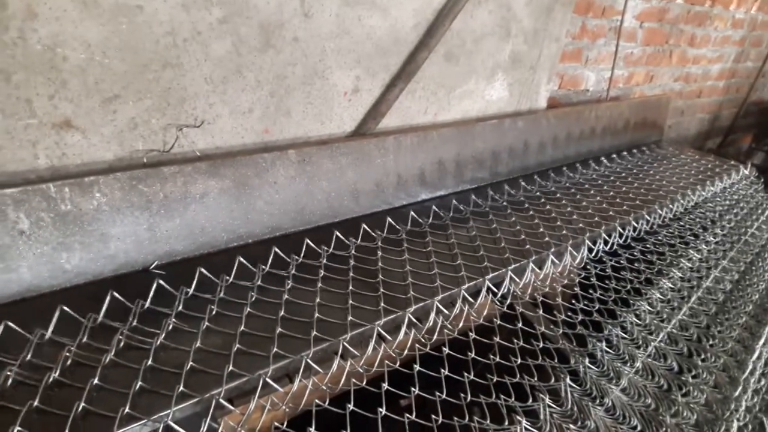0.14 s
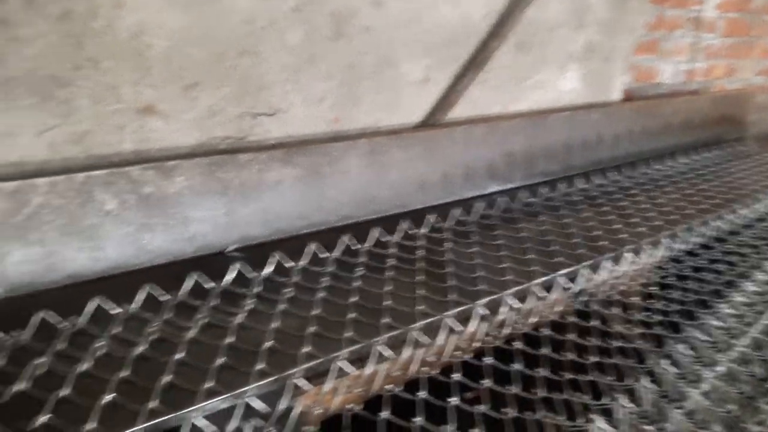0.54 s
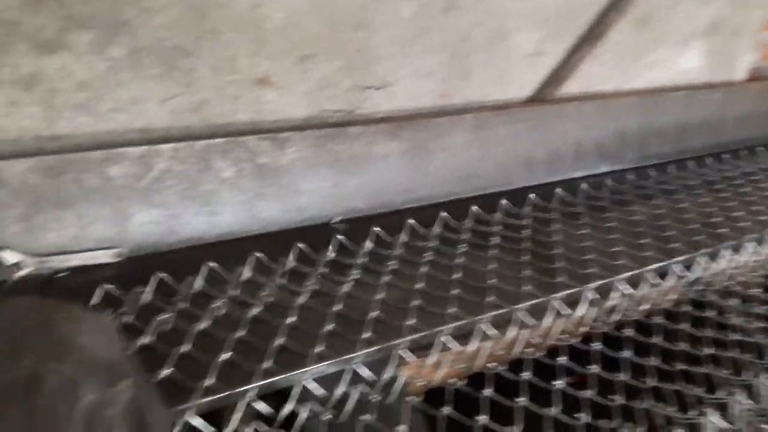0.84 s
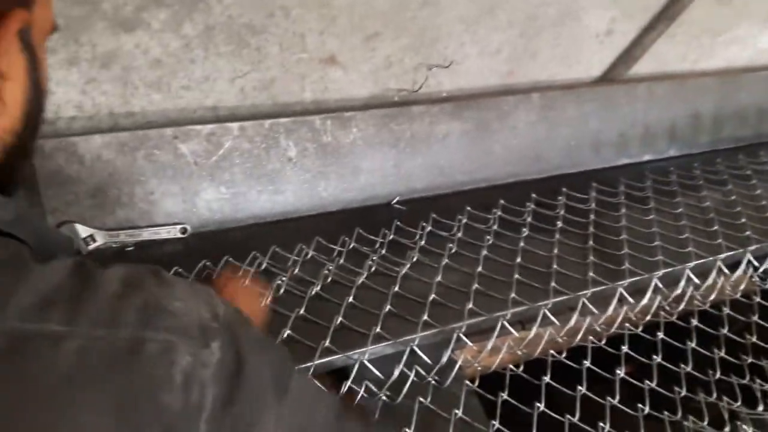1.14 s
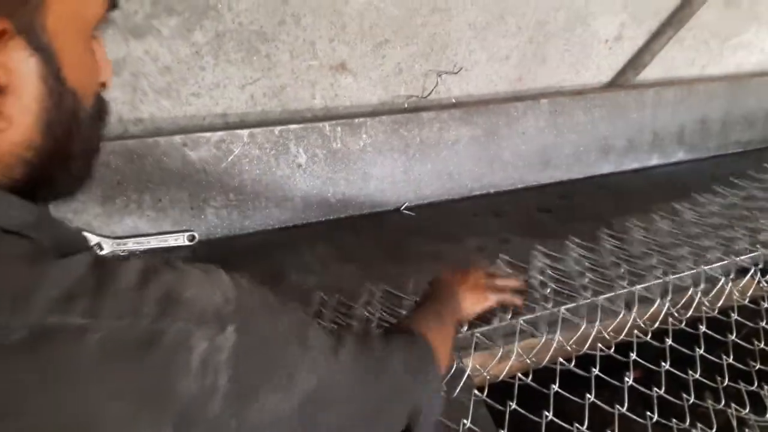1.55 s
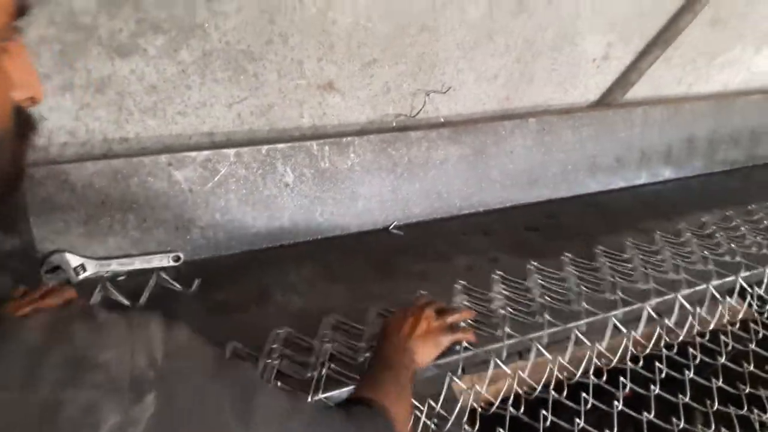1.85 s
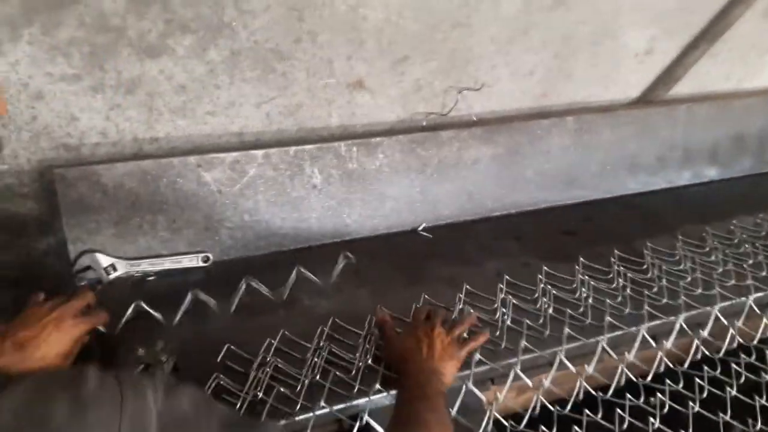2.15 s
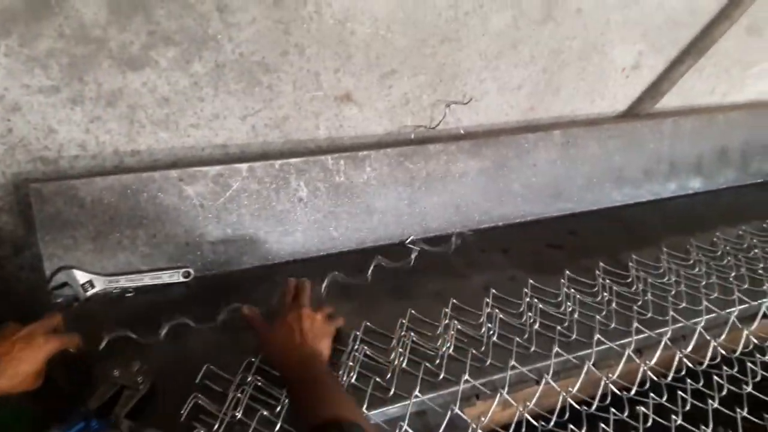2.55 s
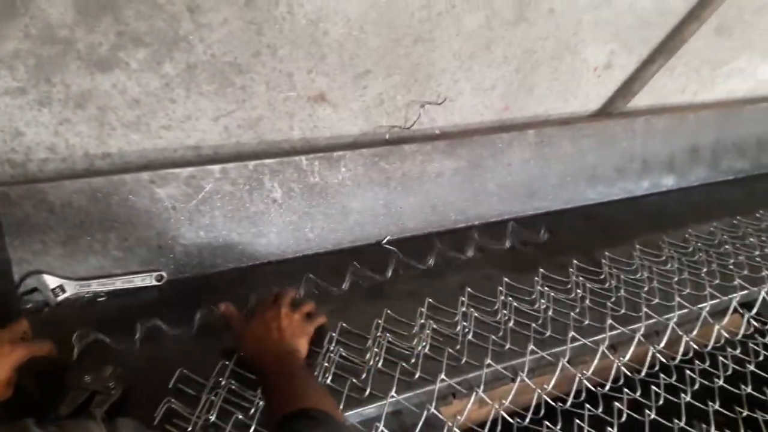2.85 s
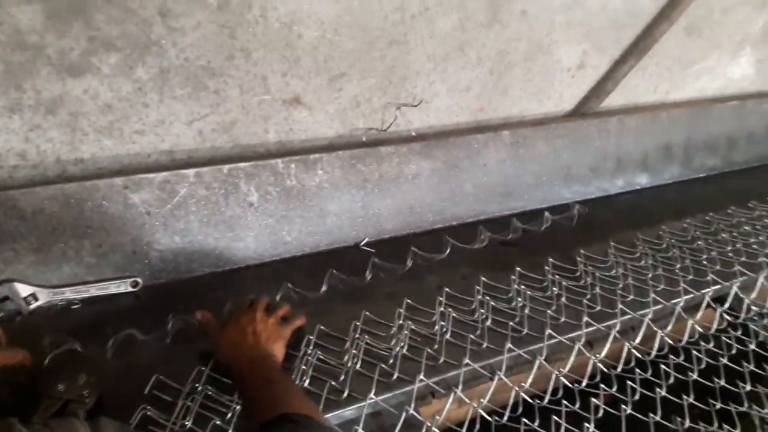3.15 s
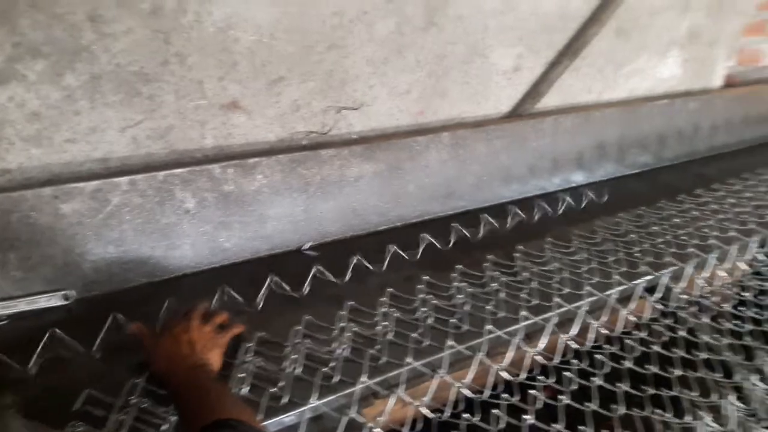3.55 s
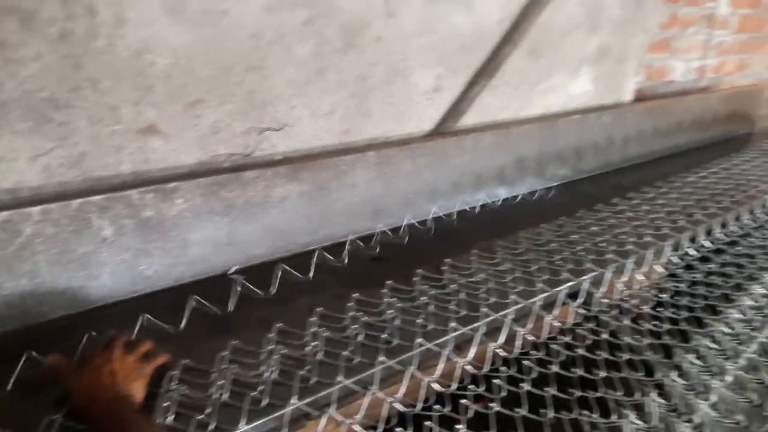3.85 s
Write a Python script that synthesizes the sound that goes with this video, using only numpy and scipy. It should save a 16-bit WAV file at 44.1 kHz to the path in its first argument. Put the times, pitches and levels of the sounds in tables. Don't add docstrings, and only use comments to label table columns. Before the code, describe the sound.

A chain-link weaving machine heard close in a hard-walled workshop. Loud mesh rattle at 0 s fades by 0.4 s to low hum. From 0.8 to 1.5 s, light hand-shifted clinks and dull knocks. Around 1.5 s the motor rumbles up; from 1.8 s irregular wire slaps grow, settling by 3 s into harsh metallic clatter about sixteen times a second until 4 s, piercingly bright, distorted, with short echo.

```python
import sys
import numpy as np
from scipy import signal
from scipy.fft import rfft, irfft
from scipy.io import wavfile
from scipy.ndimage import uniform_filter1d

SR = 44100
rng = np.random.default_rng(int(sys.argv[2]) if len(sys.argv) > 2 else 0)


def to_wav(s):
    ch = np.atleast_2d(s).T
    pcm = np.round(np.clip(ch, -1, 1) * 32767)
    wavfile.write(sys.argv[1], SR, pcm.astype(np.int16))


def undo_db(level):
    steps = np.asarray(level, float) / 20
    return 10 ** steps


N = 176400
T = np.arange(N) / SR

# start [s], peak level [dB], hold [s], rise [s].
START_SLAPS = [(1.808, -13, 0.022, 0.001), (1.823, -10, 0.017, 0.001), (1.905, -6, 0.0082, 0.001),
               (1.933, -4, 0.006, 0.0007), (1.966, -1, 0.024, 0.00077), (2.089, -3, 0.003, 0.0007),
               (2.096, 2.5, 0.021, 0.0018), (2.140, -1, 0.018, 0.0009), (2.2, 1.5, 0.021, 0.001),
               (2.23, 2.5, 0.014, 0.001), (2.263, 4.5, 0.015, 0.001), (2.329, -1.5, 0.012, 0.001),
               (2.383, 1, 0.018, 0.0011), (2.485, -1, 0.029, 0.0013), (2.578, -11, 0.024, 0.00083),
               (2.617, 1, 0.018, 0.005), (2.74, 7.5, 0.011, 0.0011), (2.787, -1.5, 0.044, 0.001),
               (2.854, 6, 0.021, 0.003)]
SPEED_SLAPS = [(2.981, 5, 0.015, 0.003), (3.044, -1, 0.014, 0.0045), (3.102, 5, 0.013, 0.001),
               (3.1619, 5, 0.015, .001), (3.221, 4.5, 0.034, .001), (3.284, 2, 0.011, 0.002),
               (3.301, -1, 0.017, .001), (3.342, 0.5, 0.011, 0.003), (3.355, 6, 0.022, .001),
               (3.399, 2.5, 0.033, 0.0062), (3.465, -0.5, .008, .001), (3.488, 6, 0.019, 0.005),
               (3.564, -1.5, 0.011, 0.0018), (3.611, 3, 0.034, .001), (3.667, -1, 0.024, 0.0017),
               (3.731, 4.5, 0.023, .002), (3.795, 2.5, 0.017, 0.0029), (3.847, 2, 0.031, 0.0044),
               (3.912, -0.5, 0.035, 0.0058), (3.974, 0.5, .004, .001), (3.982, 8, 0.027, .001)]


def unit(x):
    return x / np.sqrt(np.mean(x ** 2))


def curve(rows):
    return undo_db(np.interp(T, *np.array(rows).T))


def colour(x, points):
    hz, db = np.array(points, float).T
    grid_hz = np.fft.rfftfreq(4096, 1 / SR)
    log_gain = np.interp(np.log(grid_hz + 1), np.log(hz), db) * np.log(10) / 20
    cepstrum = irfft(log_gain)
    cepstrum[1:2048] *= 2
    cepstrum[2049:] = 0
    impulse = irfft(np.exp(rfft(cepstrum)))
    return signal.fftconvolve(x, impulse)[:len(x)]


def ring(x, hz, t60_s):
    pole = np.exp(2j * np.pi * hz / SR - np.log(1000) / (t60_s * SR))
    return signal.lfilter([0, pole.imag], [1, -2 * pole.real, abs(pole) ** 2], x)


def resonance(x, hz, width_hz):
    return signal.lfilter(*signal.iirpeak(hz, hz / width_hz, fs=SR), x)


def walk(rate_hz):
    hold = int(SR / rate_hz)
    steps = np.repeat(rng.standard_normal(N // hold + 1), hold)
    smooth = uniform_filter1d(uniform_filter1d(steps, hold), hold)
    return unit(smooth[:N])


def ticks(rate_hz, spread_db):
    hit = rng.random(N) < rate_hz / SR
    size_db = spread_db * rng.exponential(size=N)
    return unit(hit * undo_db(size_db) * rng.standard_normal(N))


def shop_hum():
    # frequency [Hz], density [dB per Hz].
    hum_points = [(15, 8), (60, -10), (164, -2.5), (496, 3), (615, 1), (849, -0.5), (1240, -21),
                  (7710, -24), (15500, -53)]
    hum_points = hum_points[:-3] + [(5000, -18.5), (16000, -45)]
    hum = unit(colour(rng.standard_normal(N), hum_points))
    return hum * undo_db(-40 + 0.61 * walk(9.0))


def motor():
    # time [s], level [dB].
    load_points = [(0, -34), (.3, -34), (.45, -42.5), (1.1, -43.5), (1.45, -39.5), (1.58, -26.5),
                   (2.15, -25.5), (2.24, -27.5), (2.33, -25), (2.6, -29), (3.3, -31.5), (4, -28)]
    # frequency [Hz], gain [dB].
    rumble_points = [(30, -30), (90, -23.5), (135, 0.5), (260, -4.5), (450, -7), (800, -10), (2500, -10.5),
                     (6000, -41)]
    # frequency [Hz], width [Hz], level [dB], extra swell with load [exponent].
    frame_modes = [(149.6, 30, -4.5, 0.12), (252, 18, -3, 1.9), (450, 110, -8, 0), (765, 72, -3, 0.27),
                   (848, 25, -10, 0.48), (1064, 62, -3.5, 0.8)]
    full_load_db = -27
    load = curve(load_points)
    out = unit(colour(rng.standard_normal(N), rumble_points)) * undo_db(0.8 * walk(20.0))
    for hz, width_hz, db, swell in frame_modes:
        band = unit(resonance(rng.standard_normal(N), hz, width_hz))
        level = undo_db(db - 4.5 + 1.3 * walk(13.0))
        out = out + level * band * (load / undo_db(full_load_db)) ** swell
    return out * load * undo_db(-0.5)


def gear():
    pitch_hz, level_db = 1151, -37
    from_s, to_s, fade_s = 2.55, 3.55, 0.087
    phase = 2 * np.pi * np.cumsum(pitch_hz * (1 + 0.002 * walk(9.0))) / SR
    on = np.clip(np.minimum(T - from_s, to_s - T) / fade_s, 0, 1)
    return undo_db(level_db + 2.2 * walk(6.6)) * on * np.sin(phase)


def knocks():
    # start [s], level [dB], pitch [Hz], width [Hz], t60 [s].
    knock_rows = [(.08, -32, 210, 11, .5), (.26, -34, 340, 60, 0.24), (0.319, -27, 338, 43, 0.13),
                  (.35, -34.5, 680, 65, 0.54), (.79, -35, 80, 26, .15), (1.33, -32.5, 183, 25, .4),
                  (.788, -33.5, 400, 300, 0.42), (.938, -18.5, 3800, 600, 0.021),
                  (1.147, -28.5, 940, 690, 0.24), (1.146, -27.5, 443, 490, 0.48),
                  (1.146, -30, 2700, 2100, 0.27), (1.268, -24.5, 1500, 230, 0.3),
                  (1.268, -28.5, 3120, 760, 0.4), (1.269, -28.5, 4000, 330, 0.16),
                  (1.27, -29, 4960, 260, 0.15), (1.268, -30.5, 305, 170, 1), (1.449, -30, 900, 290, .15),
                  (1.17, -35.5, 500, 90, 0.72), (1.52, -27, 4500, 500, .3), (1.58, -27, 4700, 600, .3),
                  (1.7, -28, 4400, 500, .6), (1.14, -34, 220, 60, .4), (1.46, -32, 260, 80, .5),
                  (2.75, -24, 3000, 80, .6), (1.932, -28, 8500, 150, .1), (1.964, -19, 5000, 120, 0.16),
                  (2.2, -21, 4950, 90, .2), (2.2, -22, 3820, 90, .2), (2.86, -20, 4200, 90, .3),
                  (3.165, -24.5, 2390, 70, 0.23), (3.222, -20, 5050, 90, 0.29), (3.354, -21, 5720, 90, .3),
                  (3.35, -23, 1700, 140, .15), (3.49, -20, 4200, 90, .25), (3.409, -22.5, 244, 30, 0.19),
                  (3.871, -20, 149, 9.9, 0.49), (3.896, -20, 162, 30, 0.22), (3.965, -23.5, 221, 38, 0.35)]
    out = np.zeros(N + SR)
    u = T[:SR // 2]
    for at, db, hz, width_hz, t60_s in knock_rows:
        band = resonance(rng.standard_normal(SR), hz, width_hz)
        settled = unit(band[SR // 2:])
        rise = np.minimum(u * hz / 2, 1)
        out[int(at * SR):][:len(u)] += undo_db(db - 60 * u / t60_s) * rise * settled
    return out[:N]


def steel(x):
    # frequency [Hz], level [dB], t60 [s].
    trough_modes = [(2978, -3, 0.094), (3240, -3, 0.04), (4270, 11, 0.031), (4550, 12, 0.033),
                    (5050, 23.5, 0.014), (5470, 11, .02), (5740, 7.5, .04), (6190, 0, .05), (8500, 2, 0.03),
                    (2000, -50, 0.045), (11600, -26, .04)]
    out = np.zeros(N)
    for hz, db, t60_s in trough_modes:
        drive = x * undo_db(4.3 * walk(22.23))
        out = out + undo_db(db) * ring(drive, hz, t60_s)
    return out


def rattle():
    # time [s], level [dB].
    rattle_points = [(0, -11.5), (.09, -15), (.24, -20), (.36, -23.5), (.6, -34.5), (.78, -42.5), (.8, -24),
                     (.96, -27), (1.1, -32), (1.44, -36), (1.5, -18.5), (1.6, -19), (1.8, -18.5),
                     (2.05, -12.5), (2.3, -12), (2.6, -14.5), (3.3, -13.5), (4.0, -13.5)]
    # frequency [Hz], gain [dB].
    mesh_points = [(300, -13), (1000, -13.5), (2000, -7), (4000, -7.5), (6500, -11), (10000, -19),
                   (12500, -23), (16000, -31)]
    lift_s, lift_db = 0.015, -2
    clumps = undo_db(1.1 * walk(45.0) + 1.3 * walk(180.0))
    hits = ticks(rate_hz=14000, spread_db=1.1) * clumps
    for at, *_ in START_SLAPS + SPEED_SLAPS:
        lift = np.clip(1 + (T - at) / lift_s, 0, 1) * (T < at)
        hits = hits * undo_db(lift_db * lift)
    sound = unit(colour(hits, mesh_points)) + undo_db(-15.0) * unit(steel(hits))
    return sound * curve(rattle_points) * undo_db(-9.0)


def slaps():
    # start [s], peak level [dB], hold [s], rise [s].
    hand_shifts = [(0, -5.5, 0.013, .001), (0.013, 0.5, 0.035, 0.0025), (0.05, 0, 0.035, 0.0048),
                   (0.144, -4, 0.016, 0.0026), (0.175, -6.5, 0.055, 0.0033), (0.785, -14.5, 0.024, .001),
                   (0.82, -14.5, 0.017, .001), (0.862, -12, 0.014, .002), (0.91, -13, 0.026, .008),
                   (1.013, -23, 0.0087, .002), (1.04, -16, 0.026, .001), (1.15, -28, 0.013, .001),
                   (1.262, -33, 0.023, .001), (1.446, -17, .015, .001), (1.465, -16, .03, .003),
                   (1.522, -11.5, 0.029, 0.0053), (1.566, -8, 0.024, 0.0054)]
    # start [s], peak level [dB].
    link_clinks = [(0.0524, -10), (0.0704, 1), (0.1584, -1), (0.164, -4), (0.1815, -6), (0.204, -4),
                   (1.9714, -1), (1.992, -1), (2.0034, -3), (2.0634, -5), (2.1016, 4), (2.1114, 2),
                   (2.1544, 3), (2.1724, -5), (2.2054, 1), (2.2384, -4), (2.2834, -3), (2.426, -1.5),
                   (2.497, -5), (2.5134, -1), (2.5396, -5), (2.6304, 2), (2.7124, -7), (2.7447, -3),
                   (2.8134, -1), (2.8676, 4), (2.8954, -6), (2.992, -3), (3.0144, -1), (3.052, 1),
                   (3.0754, -4), (3.1103, 1), (3.1664, 4), (3.2326, 4), (3.249, -2), (3.3004, 1),
                   (3.3074, 0), (3.424, 0), (3.439, 0), (3.494, 2), (3.5124, 0), (3.6294, 1), (3.6834, -2),
                   (3.732, -5), (3.7754, -5), (3.8084, -4), (3.8624, 1)]
    # start [s], peak
    # level [dB].
    first_strikes = [
        (1.9312, -4),
        (1.9622, 1),
        (2.0862, 4),
        (2.1965, 4),
        (2.229, 3),
        (2.2612, 4),
        (2.921, -6),
        (2.9655, -7),
        (3.4652, 2),
    ]
    # frequency [Hz], gain [dB].
    wire_points = [(300, -13.5), (1000, -14), (2000, -13.5), (4000, -9.5), (6500, -6), (10000, -9),
                   (12500, -15), (16000, -14)]
    fade_t60_s, blow_db, blow_s = 0.096, 4.5, 0.0048
    clink_db, clink_s, clink_rise_s = 6.5, 0.0031, 0.00071
    power, blow = np.zeros(N + SR), np.zeros(N + SR)
    u = T[:SR // 4]
    for at, db, hold_s, rise_s in START_SLAPS + SPEED_SLAPS + hand_shifts:
        start = int(at * SR)
        grow = undo_db(db) * np.minimum(u / rise_s, 1)
        fade = undo_db(-60 * np.maximum(u - hold_s, 0) / fade_t60_s)
        power[start:][:len(u)] += (grow * fade) ** 2
        blow[start:][:len(u)] += grow * undo_db(blow_db) * np.exp(-u / blow_s)
    for at, db in link_clinks + first_strikes:
        rise = np.minimum(u / clink_rise_s, 1)
        blow[int(at * SR):][:len(u)] += undo_db(db + clink_db) * rise * np.exp(-u / clink_s)
    power, blow = power[:N], blow[:N]
    bounces = ticks(rate_hz=18000, spread_db=1.1) * undo_db(1.1 * walk(160.0)) * np.sqrt(power)
    hits = bounces + blow * rng.standard_normal(N)
    sound = unit(colour(hits, wire_points)) + undo_db(-13.5) * unit(steel(hits))
    return sound * np.sqrt(power.mean()) * undo_db(-18)


def sheet(x):
    # frequency [Hz], gain [dB].
    sheet_points = [(1200, 0), (2650, -2), (2950, 3), (3150, 2), (3550, -1), (4250, 2), (4650, 0),
                    (5300, 0)]
    return colour(x, sheet_points)


def room(x):
    t60_s, level_db, top_hz = 1.0, -8.5, 6170
    u = T[:SR]
    noise = rng.standard_normal(SR) * (u > 0.006)
    low = signal.lfilter(*signal.butter(1, top_hz, fs=SR), noise)
    high = noise - low
    tail = low * undo_db(-60 * u / t60_s) + high * undo_db(-60 * u / (t60_s * 0.41))
    tail = tail / np.sqrt(np.sum(tail ** 2))
    return undo_db(level_db) * signal.fftconvolve(x, tail)[:N]


def scene():
    background = shop_hum() + motor() + gear()
    metal = knocks() + sheet(rattle() + slaps())
    return (background + metal + room(metal))[None]


def top_cut(x):
    return signal.sosfilt(signal.butter(12, 15680, fs=SR, output="sos"), x)


def record(dry):
    port_hz, port_width_hz, port_db = 7850, 915, 15.5
    x = dry + undo_db(port_db) * resonance(dry, port_hz, port_width_hz)
    x = signal.lfilter(*signal.butter(2, 62, "high", fs=SR), x)
    mix = np.clip(x, -0.91, 0.89)
    return top_cut(mix)


dry = scene()
out = record(dry)
to_wav(out)
```